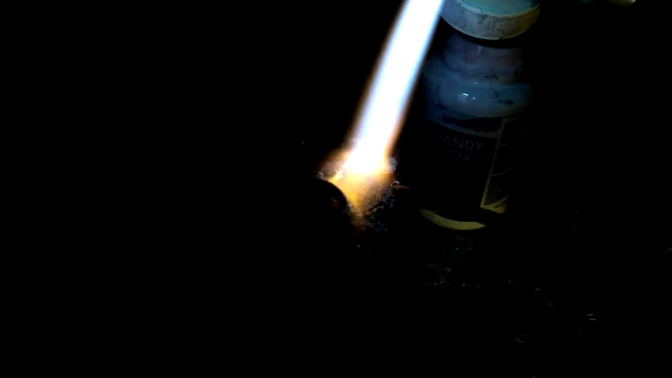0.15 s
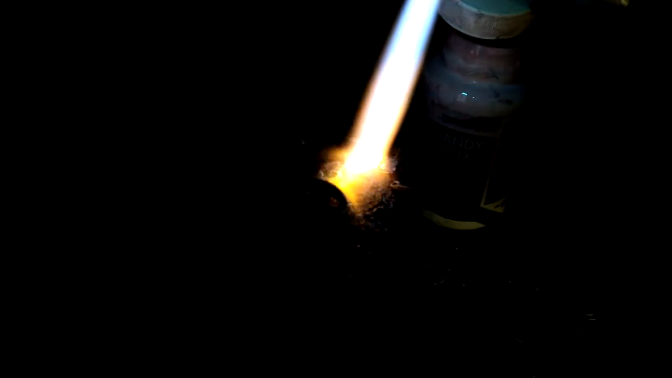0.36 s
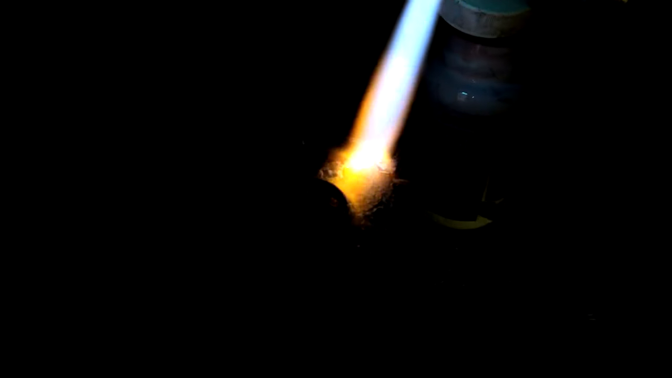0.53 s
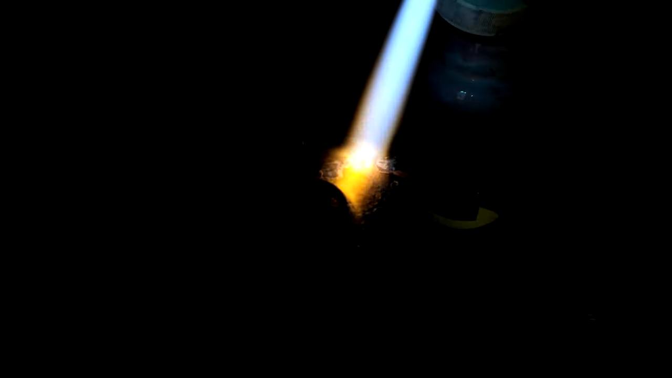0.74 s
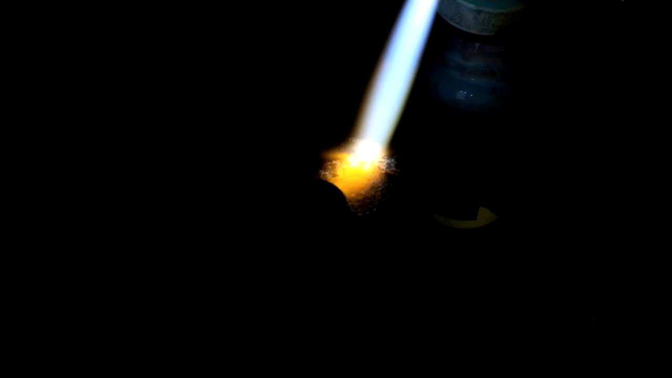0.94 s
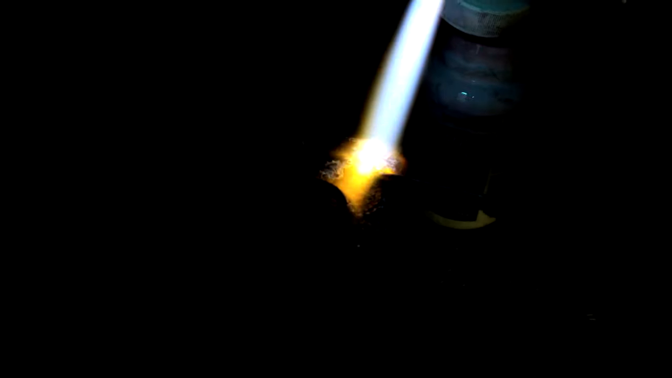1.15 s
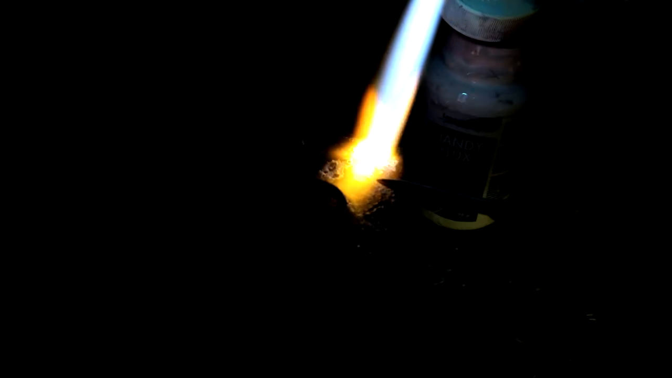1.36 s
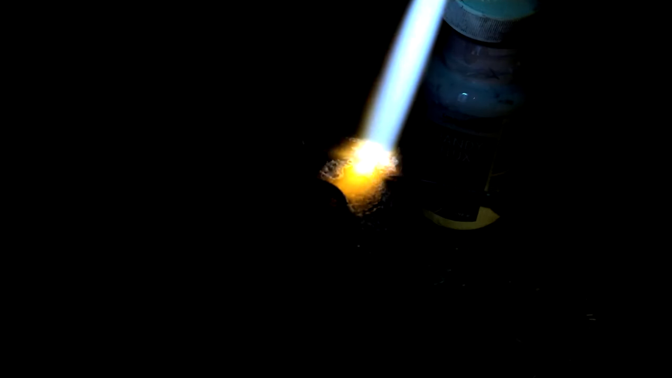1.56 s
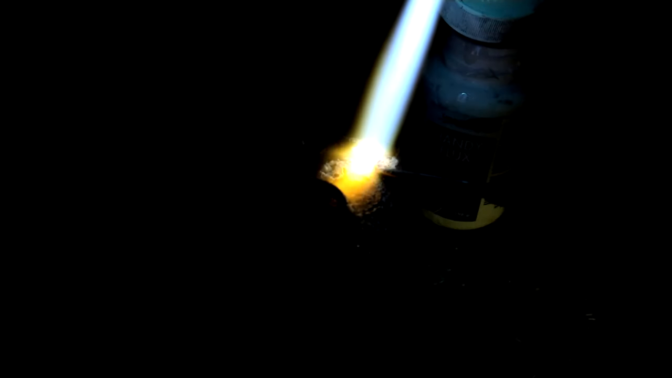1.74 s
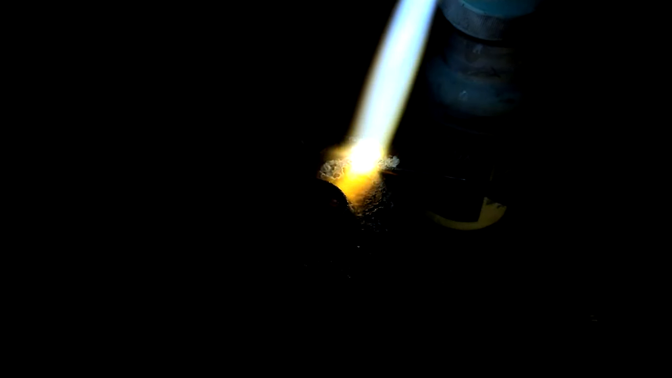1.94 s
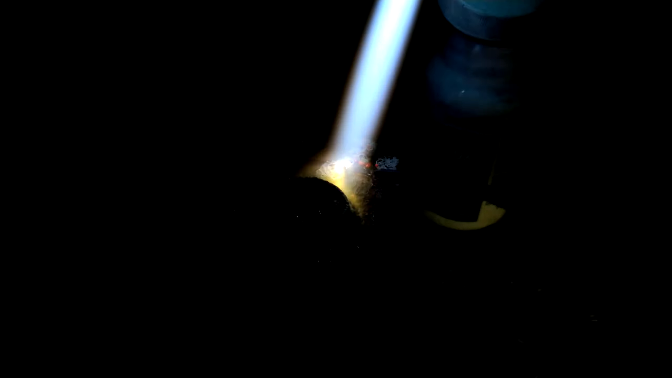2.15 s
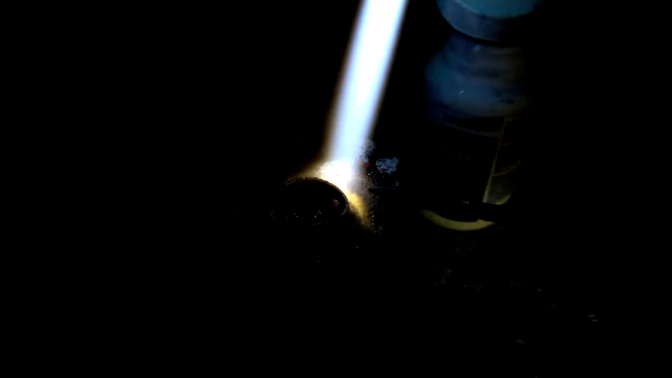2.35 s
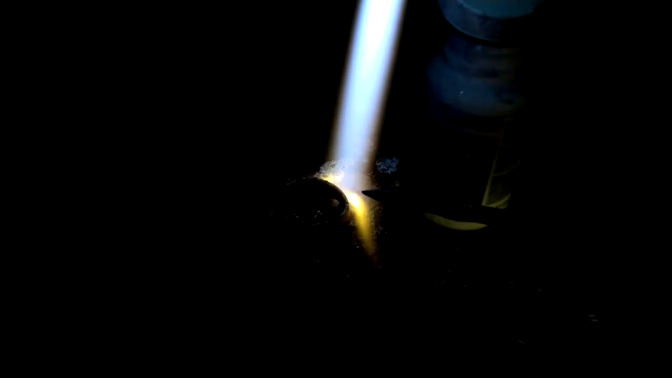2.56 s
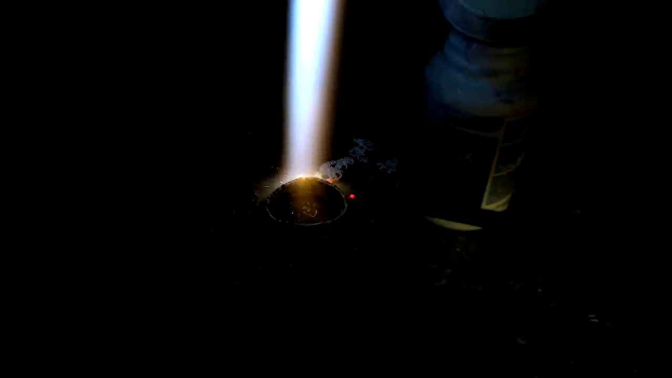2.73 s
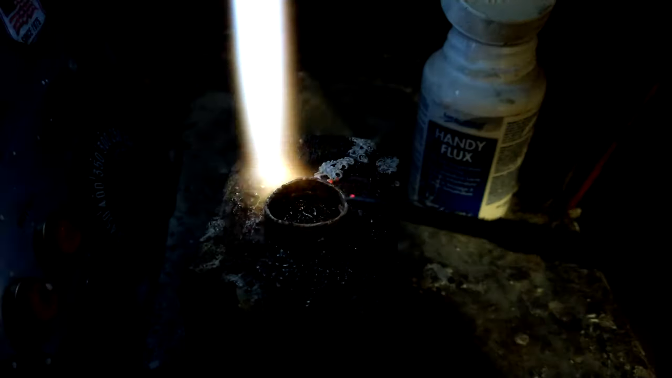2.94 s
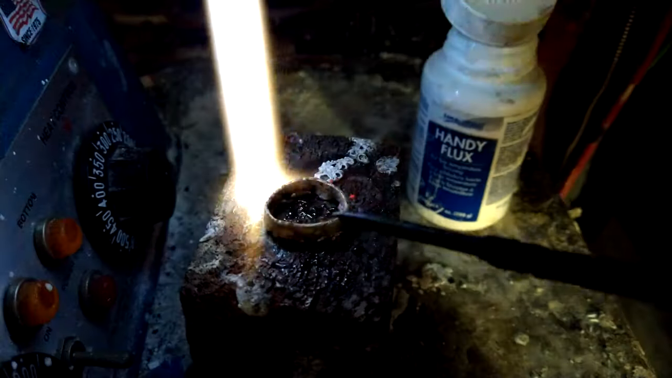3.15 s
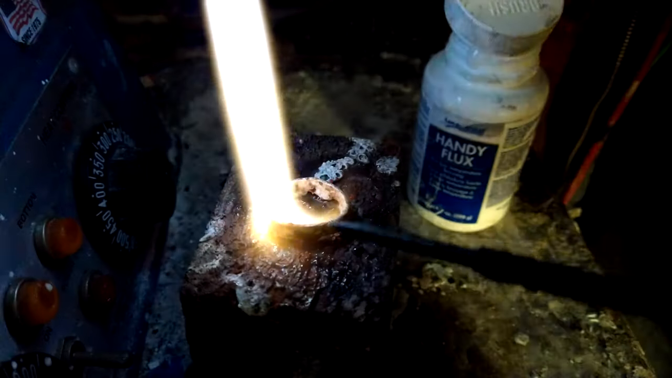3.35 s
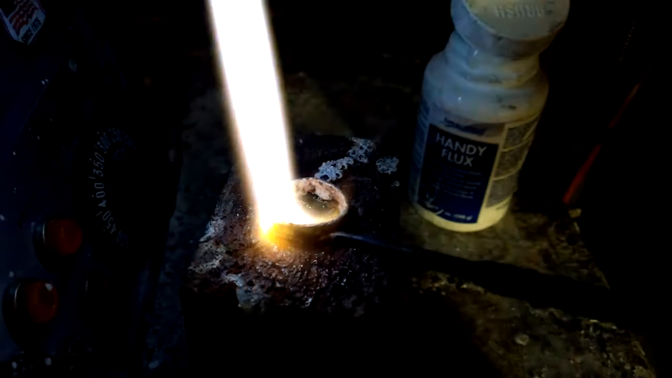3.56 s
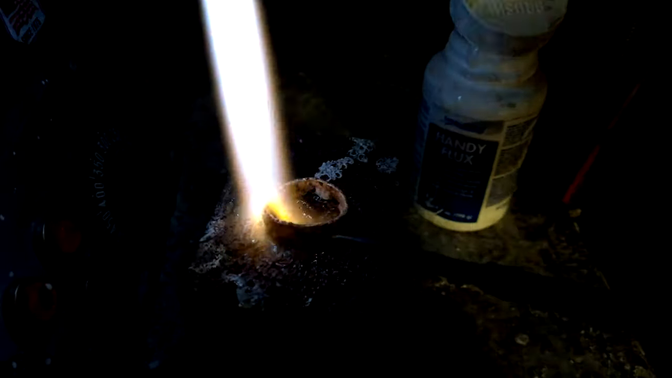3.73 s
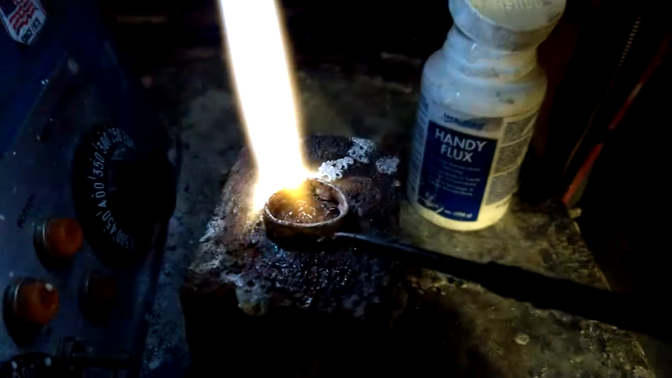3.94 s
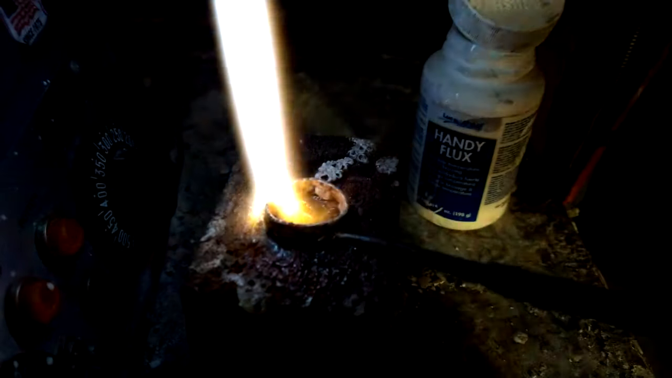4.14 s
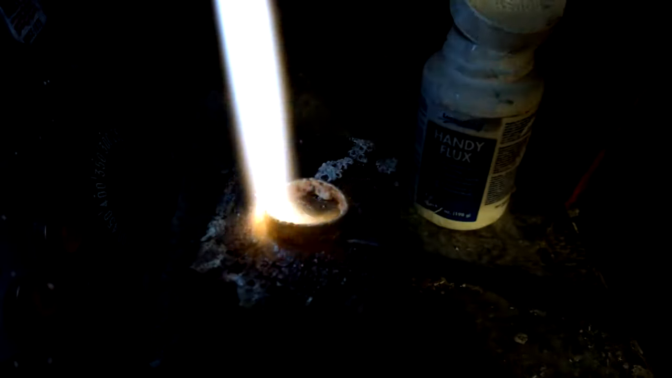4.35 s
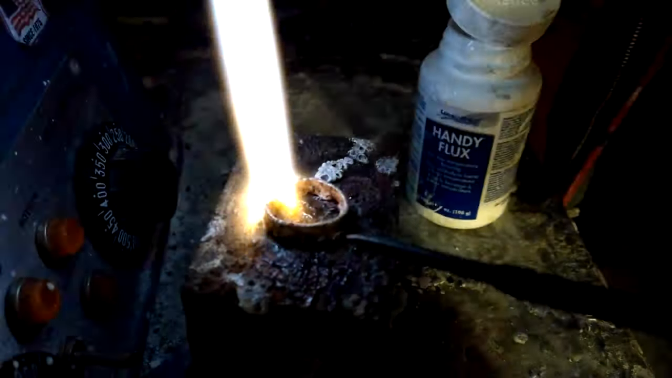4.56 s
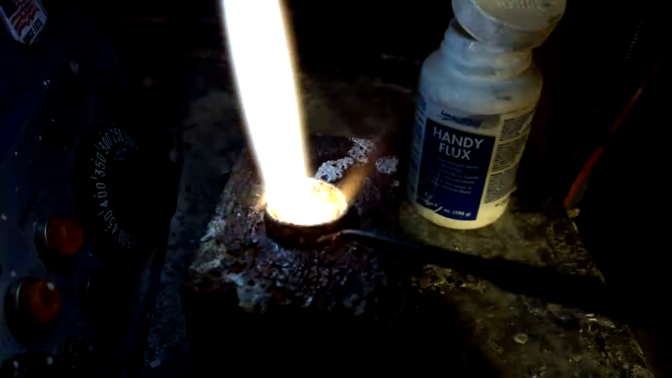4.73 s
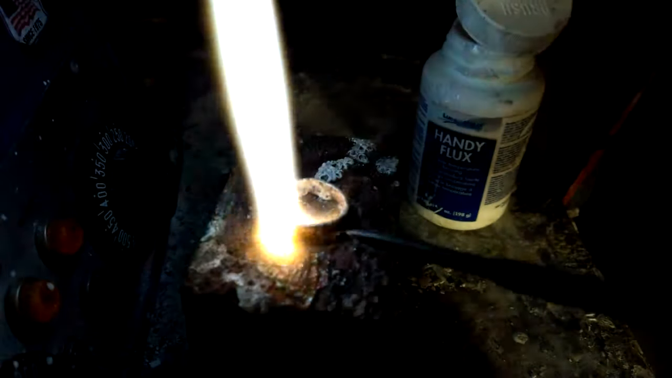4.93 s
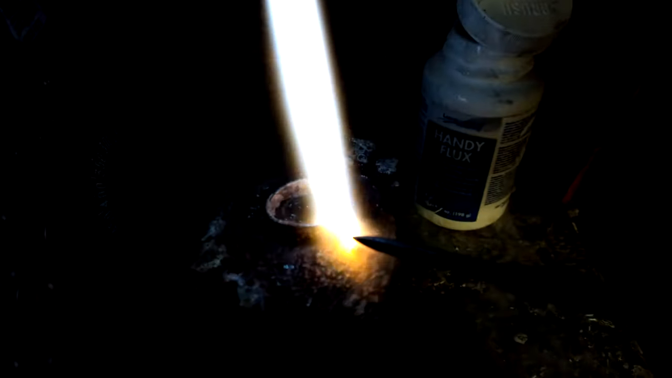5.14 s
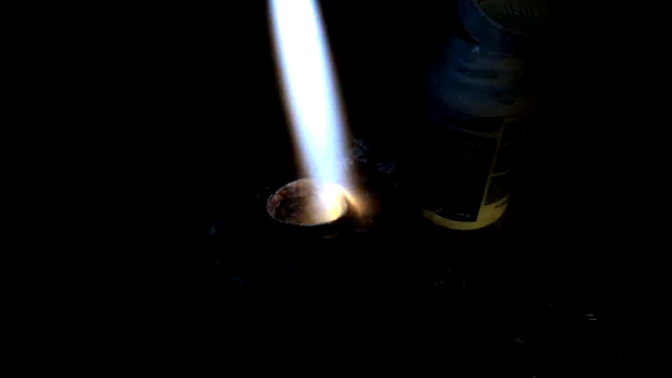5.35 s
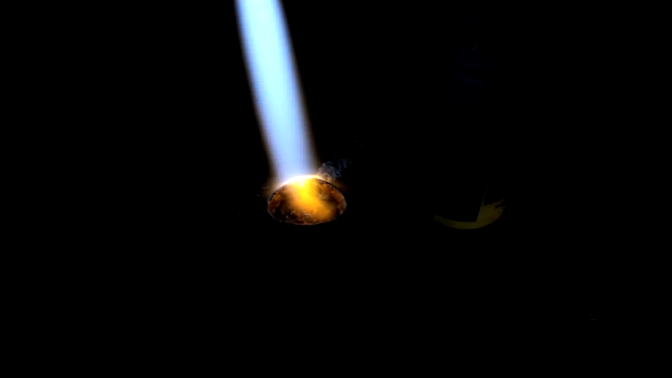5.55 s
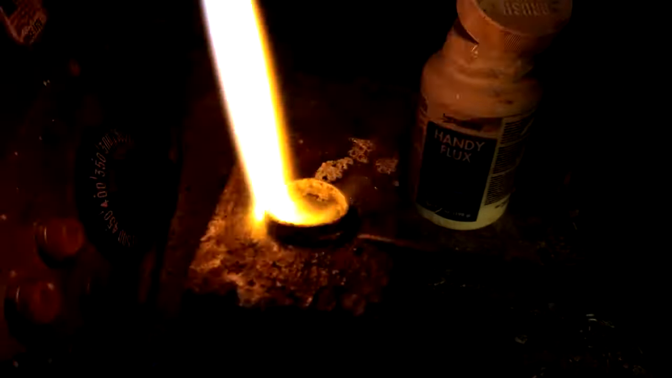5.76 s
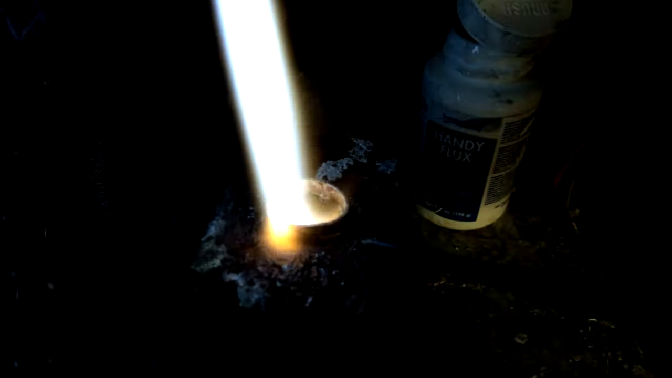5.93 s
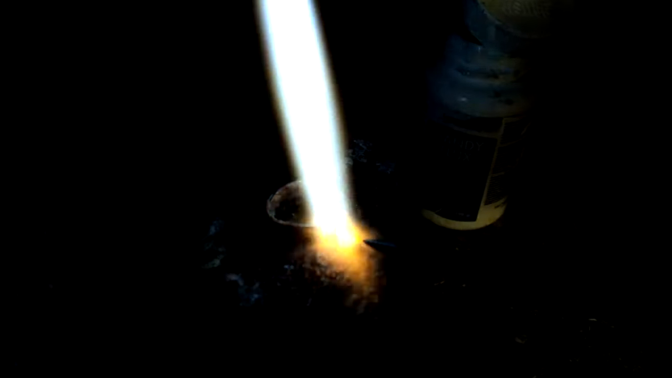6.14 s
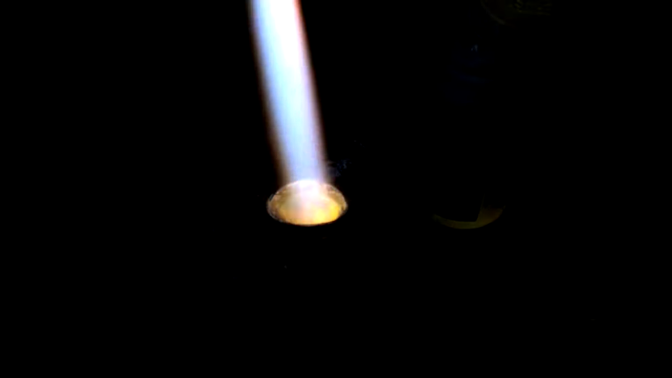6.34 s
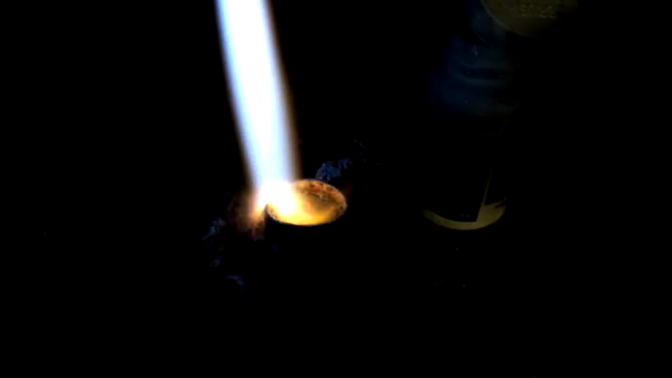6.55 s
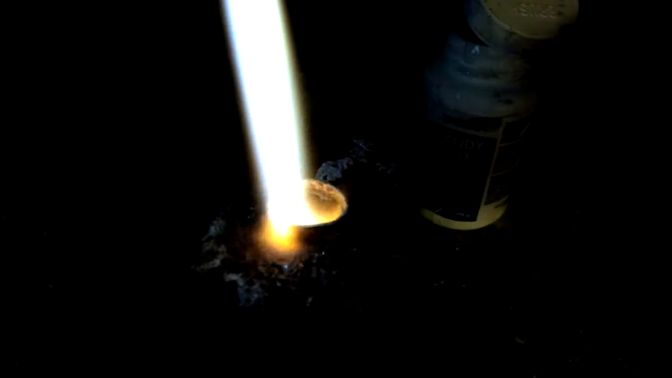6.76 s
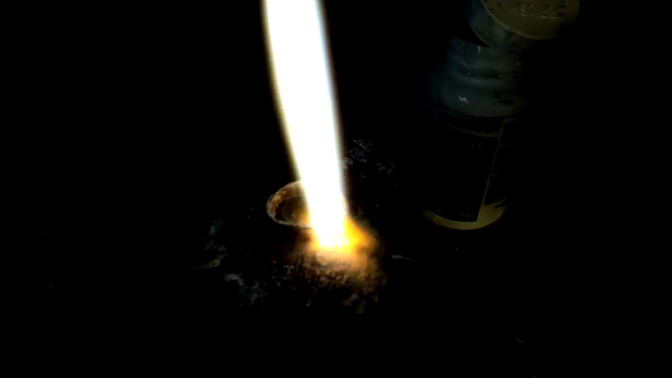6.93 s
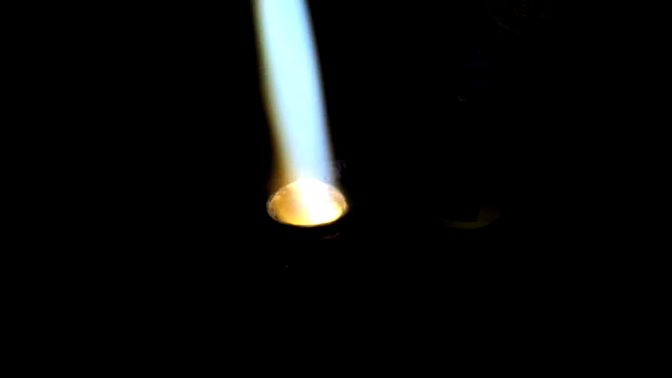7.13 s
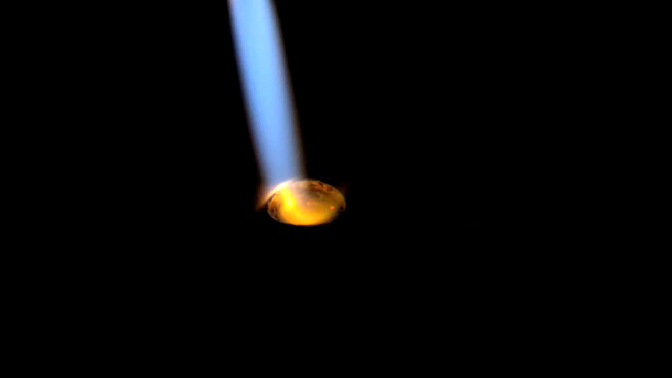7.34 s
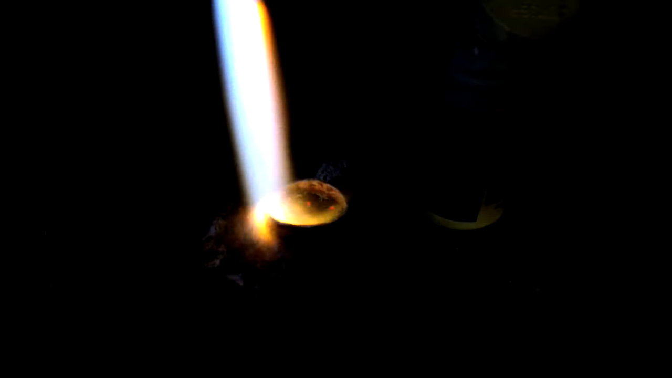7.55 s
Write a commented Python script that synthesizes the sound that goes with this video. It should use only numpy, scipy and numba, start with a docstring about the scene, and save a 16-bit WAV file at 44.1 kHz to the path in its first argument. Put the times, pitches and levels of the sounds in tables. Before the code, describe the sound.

Heard close up in a small, quiet workshop, a gas torch gives a thin, high, steady hiss flecked with brief spits. After a few seconds the flame moves from a metal piece into a little cup, and the hiss turns fuller and slightly whistling. Its tone wavers and the spits come more often as the flame wanders between cup and rim. A very faint room rumble and hum lie underneath.

```python
"""A gas torch plays on metal at a workbench in a small quiet shop.
Its jet is turbulent broadband noise that sputters in short puffs. Resonances of the hollow work and
the bench filter the noise, and change as the flame swings from the first piece into a small melting
cup and on to its rim. Reflections interfere with the direct sound and cut narrow dips in its spectrum.
A faint room rumble and hum lie below."""
import sys
import numpy as np
from scipy import signal
from scipy.fft import rfft, irfft
from scipy.io import wavfile
from numba import njit

SR = 44100
rng = np.random.default_rng(int(sys.argv[2]) if len(sys.argv) > 2 else 0)


def bounce(signal):
    """Save signal as a 16-bit WAV file at the path given by the first command-line argument."""
    frames = np.transpose(np.atleast_2d(signal))
    limited = np.clip(frames, -1, 1)
    pcm = np.round(limited * 32767).astype(np.int16)
    wavfile.write(sys.argv[1], SR, pcm)


N = 339129

# Spectrum of the room rumble: frequency_hz, relative_density_db
RUMBLE_SPECTRUM = [(24, -46.5), (40, -21.5), (107, -3.5), (145, -4.5), (179, -1.5), (212, -2.5),
                   (418, -7.5), (590, -1.5), (843, -5.5), (950, -14.5), (1240, -39), (2090, -120)]
# Brief swells of the low rumble: centre_s, rise_db, sigma_s
RUMBLE_SWELLS = [(1.18, 3.5, 0.06), (2.55, 2, 0.091), (5.2, 7.5, 0.058)]
# Hum tones: pitch_hz, base_level_db
HUM_TONES = [(119, -82), (188, -84)]
# Swell of the second hum tone: time_s, gain_db
HUM_SWELL = [(0, -18), (4.2, -10), (4.802, 7.5), (6.2, 1), (7.69, 10)]
# Where the flame points (0 first piece, 1 cup, 2 rim): time_s, place
FLAME_AIM = [(0, 0.14), (2.5, 0.24), (2.85, 0.98), (3.0, 0.66), (5.0, 0.71), (5.2, 1.96), (5.55, 1.87),
             (5.7, 1.3), (6.0, 1.34), (6.1, 2.07), (7.69, 1.72)]
# Resonances at each place, weighted within their own band: centre_hz, width_hz, weight_db
PIECE_RESONANCES = [(1340, 87, -24), (1645, 620, -21), (2164, 230, -29), (2962, 330, -12.5),
                    (3520, 92, -14.5), (3914, 970, -7.5), (4340, 630, -4), (4770, 350, -5.5),
                    (5270, 470, -11.5), (5447, 290, -3), (5786, 320, -9), (6250, 340, -9), (6770, 340, 0),
                    (6475, 240, -3), (7186, 700, -0.5), (7410, 230, 10.5), (7730, 220, -1),
                    (7700, 120, -22.5)]
CUP_RESONANCES = [(1118, 202, -9.5), (1500, 490, -10), (2080, 240, -11.5), (2830, 830, -37),
                  (3440, 240, -28), (3740, 560, -17), (4170, 490, -11.5), (4660, 760, -19.5),
                  (5203, 290, -4), (5450, 250, -1.5), (5773, 310, 0), (5977, 160, -5), (6219, 173, -5),
                  (6870, 180, -8), (6980, 500, -10.5), (7300, 220, -2), (7760, 340, -8), (7532, 117, -26),
                  (7760, 67, -30.5)]
RIM_RESONANCES = [(1080, 133, -26.5), (1490, 580, -30), (2104, 540, -29.5), (2740, 240, -28.5),
                  (3200, 270, -22), (3675, 460, -14.5), (4170, 440, -10.5), (4640, 360, -14),
                  (5054, 260, -4.5), (5350, 410, -1), (5620, 150, -2.5), (5880, 150, -9.5), (6120, 180, -4),
                  (6560, 380, -14.5), (6940, 250, -16.5), (7310, 300, -14.5), (7630, 220, -9),
                  (7830, 200, -13.5), (8140, 210, -21.5)]
# Dips cancelled by bench echoes at each place: centre_hz, width_hz, depth_db
PIECE_DIPS = [(1130, 130, 17.5), (1810, 90, 7), (2470, 78, 8), (3540, 48, 10.5), (6885, 100, 12),
              (7360, 140, 12.5), (7970, 220, 20.5)]
CUP_DIPS = [(970, 110, 7.8), (1770, 38, 2.4), (2660, 59, 4.1), (4570, 160, 3.2), (5710, 140, 3.3),
            (7090, 130, 6.6)]
RIM_DIPS = [(980, 41, 10), (1790, 100, 6.2), (2400, 150, 16), (3040, 41, 5.1), (5760, 61, 4.5),
            (6930, 100, 8.6)]
# Edges between six bands (roar, hiss, cup ring, upper cup ring, rim ring, sizzle): edge_hz
BAND_EDGES = [2500, 4850, 5780, 6430, 7170]
# Bands that move with the hand: time_s, upper_ring_db, sizzle_db, hiss_db
HAND_LEVELS = [(0.0, -47, -37, -41), (0.02, -52, -41, -41.5), (0.81, -52, -44, -42),
               (1.69, -44.5, -42, -45), (2.5, -56, -43.5, -43), (2.78, -49, -36.5, -41.5),
               (3.0, -37, -43.5, -43), (3.34, -30, -44, -43.5), (3.38, -32, -56, -44),
               (3.7, -36.5, -44.5, -41), (3.88, -29, -49, -39), (4.09, -32.5, -51, -41.5),
               (4.13, -34, -42, -40.5), (4.3, -36, -52, -41.5), (4.67, -31.5, -52, -40),
               (4.75, -35.5, -43.5, -41.5), (4.99, -34, -52.5, -41), (5.29, -43, -39.5, -41.5),
               (5.46, -37.5, -43, -42.5), (5.65, -35.5, -50, -40.5), (5.97, -32, -48, -41),
               (6.08, -37, -52, -43.5), (6.23, -40.5, -39, -39.5), (6.38, -39.5, -41, -44),
               (6.66, -34.5, -46.5, -40.5), (6.94, -36, -48, -43), (6.96, -40, -43.5, -40.5),
               (7.13, -42.5, -37, -42), (7.56, -35.5, -46, -41.5), (7.69, -34.5, -44, -41)]
# Usual level of the upper cup ring: piece_db, cup_db, rim_db
USUAL_RING_LEVELS = (-51, -34, -38)
# Bands that follow the upper ring's swing (rows: roar, cup ring, rim ring):
# piece_db, cup_db, rim_db, piece_swing_ratio, cup_swing_ratio, rim_swing_ratio
FOLLOWING_BANDS = [(-60, -58.5, -58, -0.1, 0.1, 0.05), (-48.5, -33, -34.5, 0.3, 0.3, 0.2),
                   (-44, -41.5, -47.5, 0.7, 0.65, 0.5)]
# Upper gliding dip (rows: piece, cup, rim): centre_hz, glide_hz_per_swing_db, cancelled_fraction
HIGH_DIP = [(6220, 7, 0.8), (6560, 3, 0), (6810, 81.5, 0.75)]
# Lower gliding dip, deepest while the torch crosses over: time_s, centre_hz, cancelled_fraction
LOW_DIP = [(1.9, 3400, 0.05), (2.25, 3260, 0.85), (3.1, 3170, 0.85), (3.4, 3100, 0.1), (4.95, 3050, 0.1),
           (5.2, 3020, 0.7), (5.7, 3050, 0.2)]
# Strongest spits of the flame: time_s, rise_db
STRONG_SPITS = [(0.792, 7.5), (1.2547, 3), (1.2768, 4), (1.6674, 7), (2.6748, 6), (2.887, 2.5), (2.9755, 8),
                (3.204, 6.5), (3.3274, 7), (3.3995, 8), (3.7413, 4.5), (3.7598, 3), (4.428, 2), (4.5577, 5),
                (4.6866, 3), (4.8754, 2.5), (4.9318, 4.8), (5.007, 9), (5.0635, 9.5), (5.1586, 6),
                (5.423, 6.5), (5.5547, 3.5), (5.6451, 6), (5.7487, 4), (5.842, 5.5), (5.8938, 4.5),
                (6.008, 5), (6.3262, 8.5), (6.789, 4.5), (6.967, 6.5), (7.002, 5.5), (7.5965, 5)]

RUMBLE_SPLIT_HZ, LOW_RUMBLE_DB, UPPER_RUMBLE_DB = 450, -72, -71
ARRIVAL_START_S, ARRIVAL_LENGTH_S, ARRIVAL_EXPONENT = 2.5, 0.5, 2.2   # into the cup: slow, then quick
GLIDING_DIP_WIDTH_HZ = 180
ECHO_DELAY_S, ECHO_SWAY_S, ECHO_DB = 0.0033, .00006, -18.5
SPIT_LENGTH_MS, WEAK_SPITS_PER_S, WEAK_SPIT_DB = 1.5, 5.8, 3.5
POPS_PER_S, SPIT_POP_SIGMAS = 250, 6.0
MIC_NOISE_DB, CUTOFF_HZ = -100, 8510


def from_db(db):
    """Amplitude ratio of a level in decibels."""
    return 10 ** (np.asarray(db) / 20)


def unit_rms(x):
    """Normalisation to a root mean square of 1."""
    return x / np.sqrt(np.mean(x ** 2) + 1e-20)


def in_time(rows):
    """Linear interpolation: a curve for each column after time_s."""
    times_s, *columns = np.transpose(rows)
    return [np.interp(np.arange(N) / SR, times_s, column) for column in columns]


def drift(corner_hz):
    """Random fluctuation: noise through two one-pole low-passes, with unit spread."""
    pole = np.exp(-2 * np.pi * corner_hz / SR)
    slow = signal.lfilter([1], [1, -2 * pole, pole * pole], rng.standard_normal(N + SR // 2))[SR // 2:]
    return unit_rms(slow - slow.mean())


def coloured(x, power_at):
    """Minimum-phase filtering by a given power response, scaled to unit rms."""
    size = 2048
    hz = np.arange(size // 2 + 1) * SR / size + 1
    cepstrum = irfft(.5 * np.log(power_at(hz) + 1e-14))
    cepstrum[1:size // 2] *= 2   # folding the cepstrum makes the filter causal
    cepstrum[size // 2 + 1:] = 0
    impulse_response = irfft(np.exp(rfft(cepstrum)))[:size // 2]
    return unit_rms(signal.oaconvolve(x, impulse_response)[:len(x)])


def room_rumble():
    """Ambient noise in two bands, the lower one amplitude-modulated by brief swells."""
    hz, db = np.transpose(RUMBLE_SPECTRUM)
    noise = coloured(rng.standard_normal(N), lambda f: from_db(2 * np.interp(np.log(f), np.log(hz), db)))
    out, t = 0, np.arange(N) / SR
    swell_db = sum(rise * np.exp(-.5 * ((t - s) / sigma) ** 2) for s, rise, sigma in RUMBLE_SWELLS)
    for kind, level_db in (("low", LOW_RUMBLE_DB + swell_db), ("high", UPPER_RUMBLE_DB)):
        crossover = signal.butter(4, RUMBLE_SPLIT_HZ, kind, fs=SR, output="sos")
        out += from_db(level_db) * unit_rms(signal.sosfilt(crossover, noise))
    return out


def hum():
    """Two sinusoids under slow random frequency and amplitude modulation; the second swells."""
    out = 0
    for (pitch_hz, level_db), swell_db in zip(HUM_TONES, (0, in_time(HUM_SWELL)[0])):
        phase = 2 * np.pi * np.cumsum(pitch_hz + 1.3 * drift(1.7)) / SR
        out += np.sqrt(2) * from_db(level_db + swell_db + 2.1 * drift(3)) * np.sin(phase)
    return out


def bottle_echo(x):
    """Comb filtering: a reflection off a nearby bottle joins the sound; the hand sways its delay."""
    delay_s = ECHO_DELAY_S + ECHO_SWAY_S * drift(0.96)
    return x + from_db(ECHO_DB) * np.interp(np.arange(N) - delay_s * SR, np.arange(N), x)


def by_place(values):
    """Interpolation of piece, cup and rim values as the flame travels."""
    arrived = np.clip((np.arange(N) / SR - ARRIVAL_START_S) / ARRIVAL_LENGTH_S, 0, 1) ** ARRIVAL_EXPONENT
    towards_rim = np.clip(in_time(FLAME_AIM)[0] - 1, 0, 1)
    return np.interp(arrived + towards_rim, np.arange(len(values)), values)


def ring_swing_db():
    """Relative level: how far the upper cup ring stands above its usual level for the place."""
    return in_time(HAND_LEVELS)[0] - by_place(USUAL_RING_LEVELS)


@njit
def notch(x, cosine, fraction, radius):
    """Destructive interference: a moving two-pole resonance of the sound is subtracted from it."""
    out, y1, y2 = x.copy(), 0., 0.
    for i in range(2, len(x)):
        y = (1 - radius ** 2) / 2 * (x[i] - x[i - 2]) + 2 * radius * cosine[i] * y1 - radius ** 2 * y2
        y1, y2 = y, y1
        out[i] -= fraction[i] * y
    return out


def gliding_dips(x):
    """Two antiresonances glide through the spectrum as the hand moves."""
    centre_hz, hz_per_db, high_fraction = map(by_place, np.transpose(HIGH_DIP))
    high_dip = (centre_hz + hz_per_db * ring_swing_db(), high_fraction)
    radius = np.exp(-np.pi * GLIDING_DIP_WIDTH_HZ / SR)
    for dip_hz, fraction in (high_dip, in_time(LOW_DIP)):
        x = notch(x, np.cos(2 * np.pi * dip_hz / SR), np.clip(fraction, 0, 1), radius)
    return x


def work_response(resonances, dips, steepness):
    """Power response of work and bench: flat-topped resonances add, interference dips attenuate."""
    def power_at(f):
        power = sum(from_db(2 * db) / (1 + (2 * (f - hz) / width) ** 4) ** steepness
                    for hz, width, db in resonances)
        loss_db = sum(db / (1 + (2 * (f - hz) / width) ** 2) for hz, width, db in dips)
        return power * from_db(-2 * loss_db)
    return power_at


def band_levels_db():
    """Spectral envelope: the levels of the six bands, low to high, vary as the hand moves."""
    upper_ring, sizzle, hiss = in_time(HAND_LEVELS)
    swing = ring_swing_db()
    roar, cup_ring, rim_ring = (by_place(row[:3]) + by_place(row[3:]) * swing for row in FOLLOWING_BANDS)
    return roar, hiss, cup_ring, upper_ring, rim_ring, sizzle


def spits_db():
    """Transient modulation: each spit lifts the jet's level along a Gaussian bell."""
    rise_db = WEAK_SPIT_DB * (rng.random(N) < WEAK_SPITS_PER_S / SR)
    times_s, strong_db = np.transpose(STRONG_SPITS)
    rise_db[(times_s * SR).astype(int)] = strong_db
    sigma_samples = SPIT_LENGTH_MS / 2 * SR / 1000
    bell = np.exp(-.5 * (np.arange(-400, 401) / sigma_samples) ** 2)
    return signal.oaconvolve(rise_db, bell, "same")


def jet_turbulence():
    """Turbulent flow: three noises share pops of unburnt gas and a flicker at several speeds."""
    flicker_db = 0.7 * drift(8.6) + 0.76 * drift(81) + 1.73 * drift(360) + spits_db()
    pop_onsets = rng.random(N) < POPS_PER_S / SR
    pops = pop_onsets * from_db(3.06 * np.minimum(rng.exponential(1, N), 4))
    noise = rng.standard_normal((3, N)) + 2.4 * pops * np.sign(rng.standard_normal(N))
    spit_samples = (np.transpose(STRONG_SPITS)[0] * SR).astype(int)
    noise[:, spit_samples] += SPIT_POP_SIGMAS   # each strong spit has its own pop
    return noise * from_db(flicker_db), noise * from_db(.5 * flicker_db)   # hiss, steadier roar


def torch():
    """Source and filter: jet noise excites the resonances where the flame points, band by band."""
    hiss, roar = jet_turbulence()
    aim = np.clip(in_time(FLAME_AIM)[0], 0, 2)
    places = ((PIECE_RESONANCES, PIECE_DIPS), (CUP_RESONANCES, CUP_DIPS), (RIM_RESONANCES, RIM_DIPS))
    gains = [from_db(db + .5 * drift(13)) for db in band_levels_db()]   # each band wavers by itself
    out = np.zeros(N)
    for place, (resonances, dips) in enumerate(places):
        distance = np.abs(aim - place)
        heard = slice(np.argmax(distance < 1), N - np.argmax(distance[::-1] < 1))
        crossfade = np.cos(np.minimum(distance, 1) * np.pi / 2)   # equal power between neighbours
        for band, gain in enumerate(gains):
            in_band = [row for row in resonances if np.searchsorted(BAND_EDGES, row[0]) == band]
            jet = (hiss if band else roar)[(band + place) % len(places), heard]
            response = work_response(in_band, dips, steepness=1.174)
            out[heard] += (gain * crossfade)[heard] * coloured(jet, response)
    return out


def scene():
    """Superposition of the torch, its echo and the shop's background, in one channel."""
    flame = bottle_echo(gliding_dips(torch()))
    return (flame + room_rumble() + hum())[None]


def record(dry):
    """Band limiting: the microphone adds faint noise, drops the deepest bass and cuts the top steeply."""
    noisy = dry + from_db(MIC_NOISE_DB) * rng.standard_normal(dry.shape)
    thin = signal.sosfilt(signal.butter(3, 60, "high", fs=SR, output="sos"), noisy)
    return signal.sosfilt(signal.ellip(14, .5, 90, CUTOFF_HZ, fs=SR, output="sos"), thin)


dry = scene()
out = record(dry)
bounce(out)
```